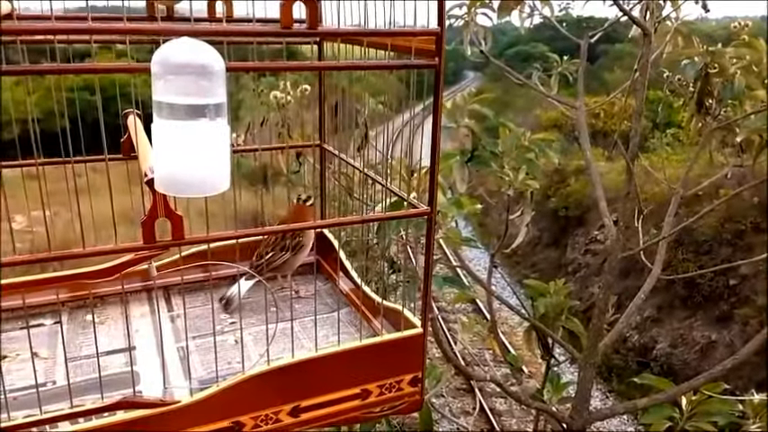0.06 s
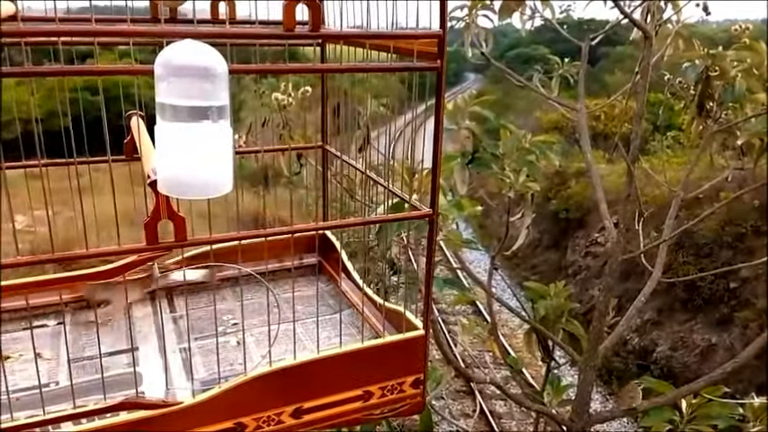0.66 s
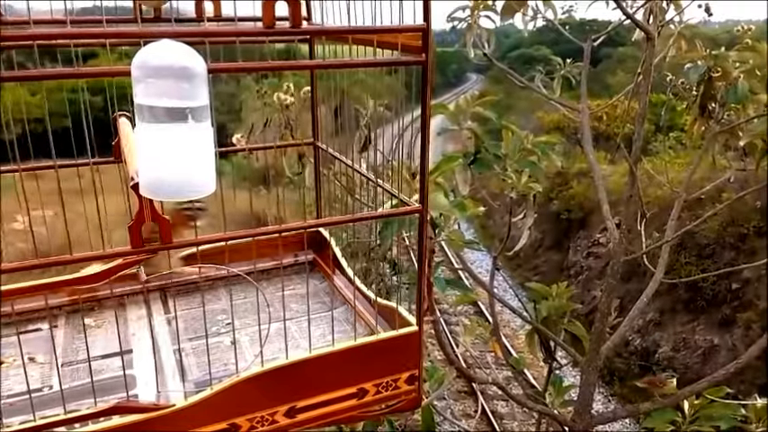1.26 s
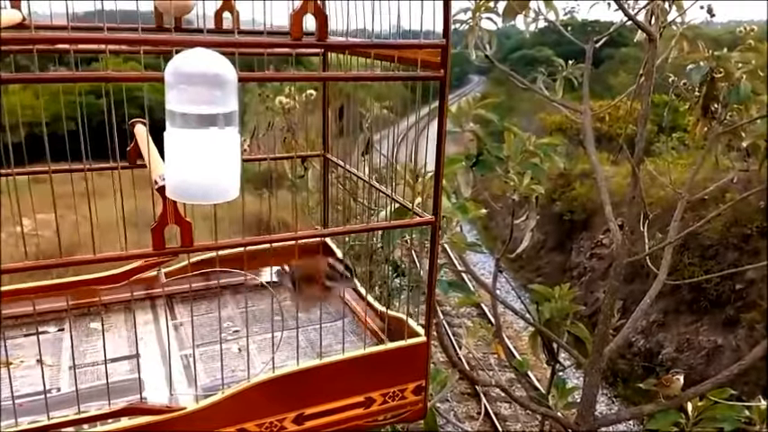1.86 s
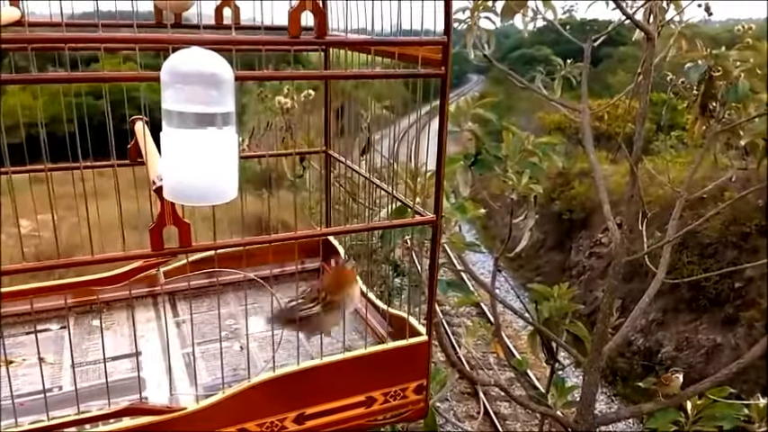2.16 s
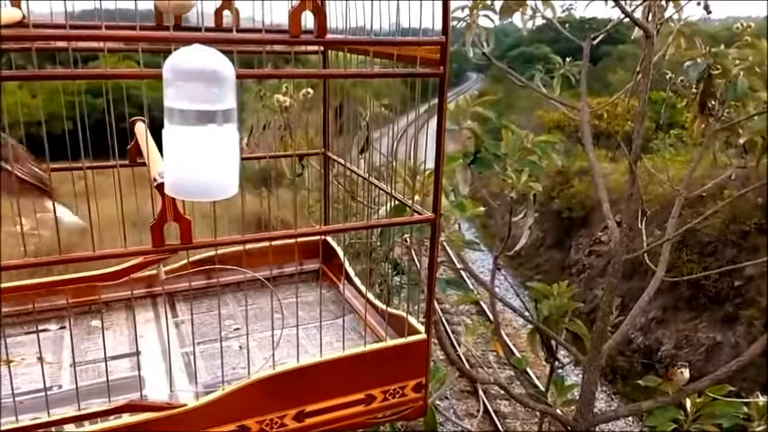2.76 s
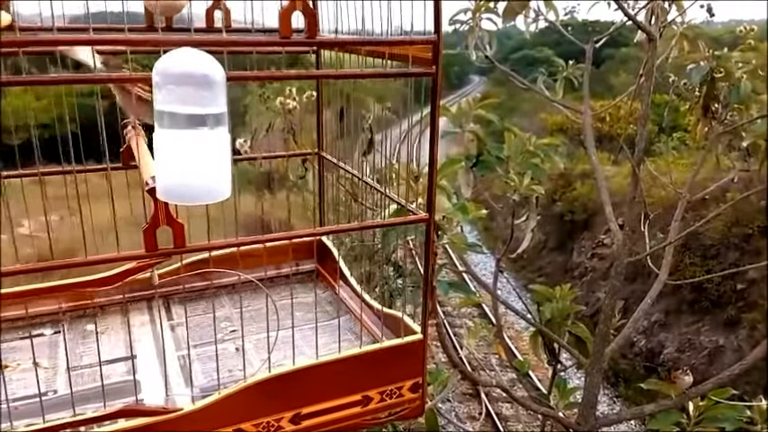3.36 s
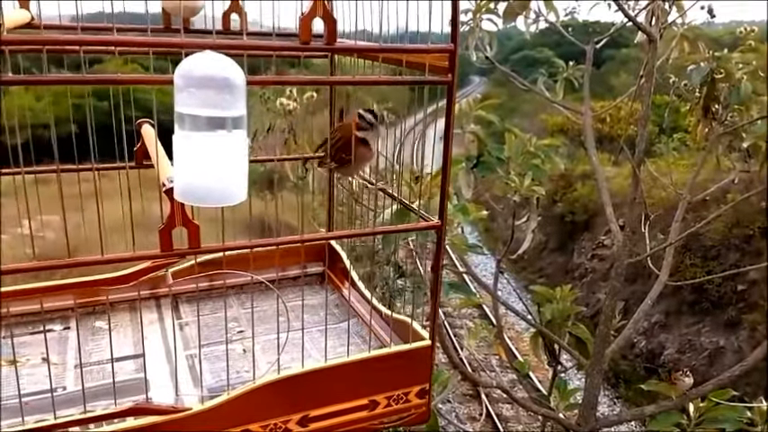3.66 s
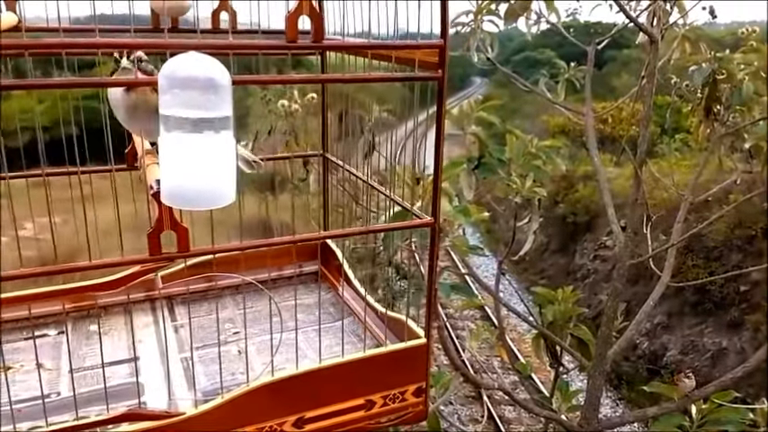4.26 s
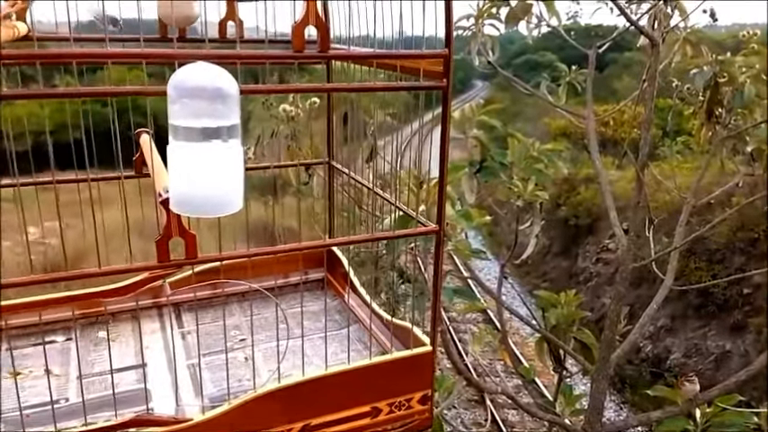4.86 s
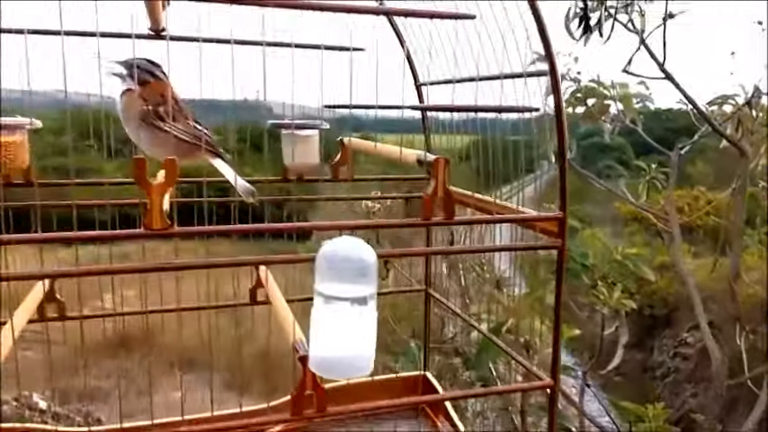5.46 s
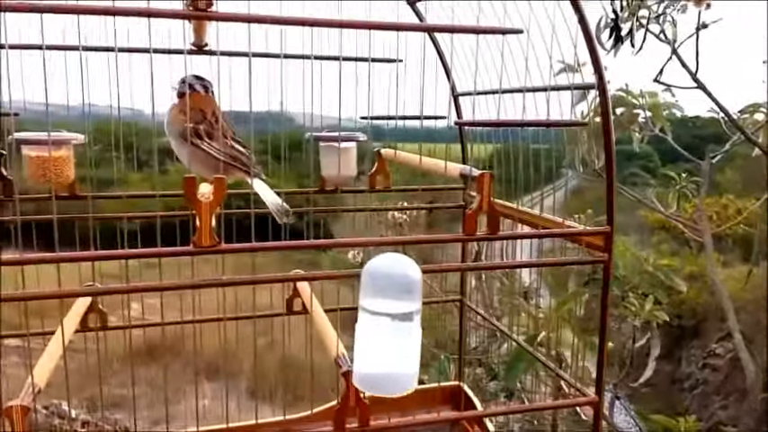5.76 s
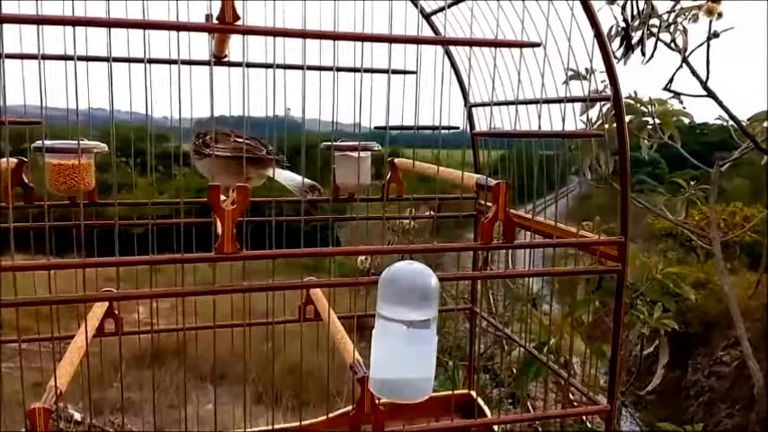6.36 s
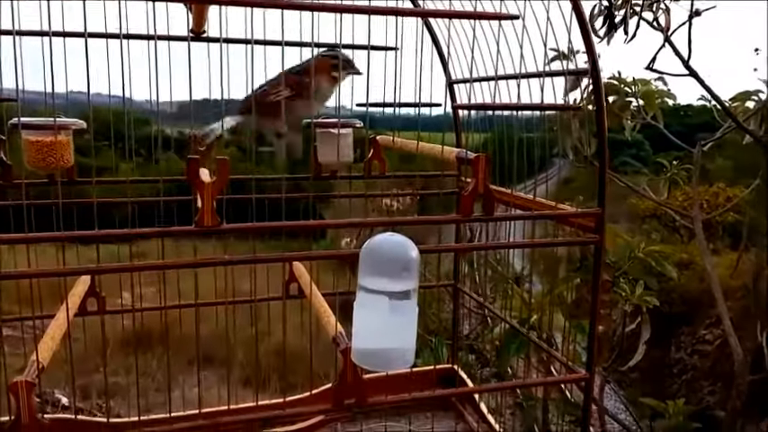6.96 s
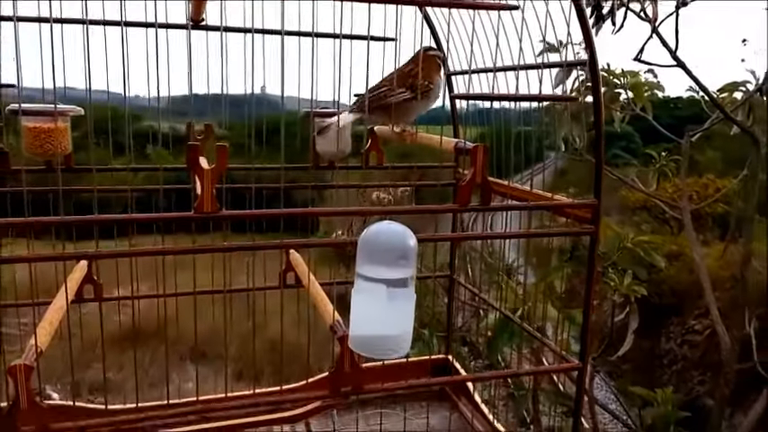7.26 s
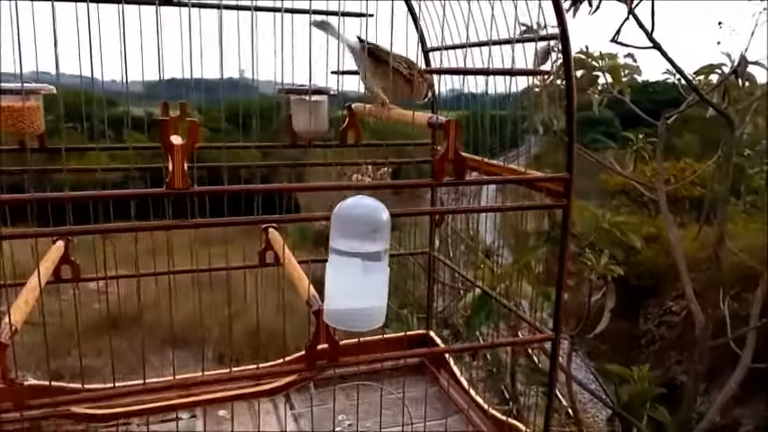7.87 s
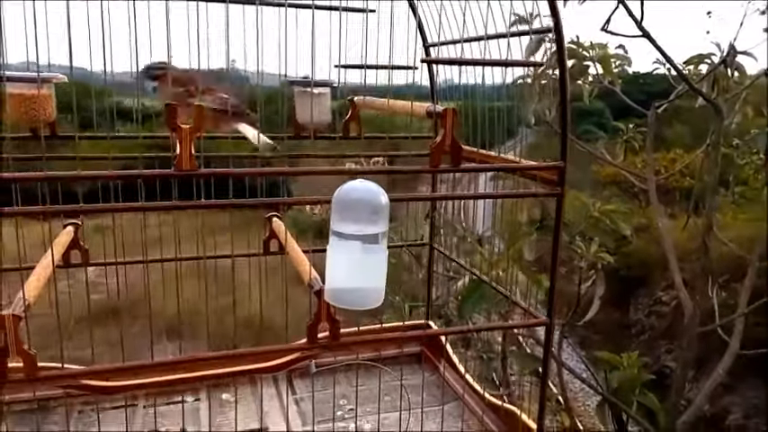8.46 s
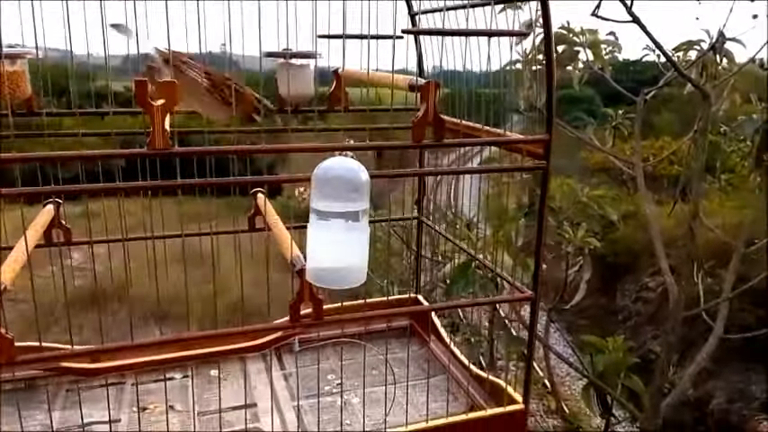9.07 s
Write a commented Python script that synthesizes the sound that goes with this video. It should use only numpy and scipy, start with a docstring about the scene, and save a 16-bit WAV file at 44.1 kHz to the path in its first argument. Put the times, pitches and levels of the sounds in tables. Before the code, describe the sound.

A small bird sings slurred whistles close by and hops about its wooden wire cage, over a steady outdoor rush.

```python
"""A steady outdoor rush, one faint chirp, then a sparrow hopping about its cage close to a phone.
Its feet and wings knock the wooden tray and rattle the wires, while other birds whistle far off.
It sings three phrases of slurred whistles, the second from a higher perch; the cage colours each
note on its way to the two microphones. The phone's gain control ducks on the loudest notes and
lets the rush swell back slowly."""
import sys
import numpy as np
from scipy import signal
from scipy.fft import rfft, irfft, next_fast_len
from scipy.io import wavfile
from scipy.ndimage import uniform_filter1d, minimum_filter1d, map_coordinates

SR = 44100
rng = np.random.default_rng(int(sys.argv[2]) if len(sys.argv) > 2 else 0)


def persist_wave(psi):
    """Save psi, clipped to +-1, as 16-bit WAV."""
    counts = np.round(np.clip(psi, -1, 1) * 32767).astype(np.int16)
    wavfile.write(sys.argv[1], SR, np.atleast_2d(counts).T)


N = 407043


def amp(db):
    """Decibels to gain."""
    return 10 ** (np.asarray(db) / 20)


def along(points, hz):
    """Read (Hz, value) points on a log frequency axis."""
    point_hz, values = np.transpose(points)
    return np.interp(np.log(hz + 1), np.log(point_hz), values)


def unit(x):
    """Scale to rms 1."""
    return x / np.sqrt(np.mean(x ** 2) + 1e-20)


def filtered(x, response):
    """Filter x by a gain given as a function of Hz."""
    n = x.shape[-1]
    size = next_fast_len(n + 8192)
    return irfft(rfft(x, size) * response(np.fft.rfftfreq(size, 1 / SR)), size)[..., :n]


def wobble(n, rate):
    """A smooth random curve of n samples, rate knots a second."""
    return map_coordinates(rng.standard_normal(int(n * rate / SR) + 4), [np.arange(n) * rate / SR])


def sides(pan_db):
    """Left and right gains of constant power; positive is to the left."""
    gains = np.array([amp(pan_db / 2), amp(-pan_db / 2)])
    return gains / np.sqrt(np.mean(gains ** 2, axis=0))


def add(track, start, sound):
    """Mix a sound into the track from start seconds on."""
    part = track[..., max(0, round(start * SR)):][..., :sound.shape[-1]]
    part += sound[..., :part.shape[-1]]


def rush(spectrum, patchy_db):
    """Wide, faintly patchy noise, leaning to the right microphone."""
    # Each row: frequency in Hz, left over right in dB.
    balance = [(110, -10.5), (380, -5), (1290, -3), (8120, -0.5), (15000, -12)]
    # Each row: frequency in Hz, correlation between the microphones.
    likeness = [(60, 0.13), (130, 0.63), (640, 0.66), (1410, 0.56), (3100, -0.45), (6800, 0.12)]
    spectra = signal.stft(rng.standard_normal((2, N)), nperseg=512)[2]
    patches = uniform_filter1d(rng.standard_normal(spectra.shape[1:]), size=6, axis=0)
    patches = unit(uniform_filter1d(patches, size=14, axis=1))
    noise = signal.istft(spectra * amp(patchy_db * patches), nperseg=512)[1][:, :N]
    angle = lambda hz: np.arccos(np.clip(along(likeness, hz), -1, 1)) / 2
    mid_side = lambda hz: amp(along(spectrum, hz)) * [np.cos(angle(hz)), np.sin(angle(hz))]
    mid, side = filtered(noise, mid_side)
    return unit(filtered(np.array([mid + side, mid - side]), lambda hz: sides(along(balance, hz))))


def background():
    """The bed of the place: a low rush and the hiss above it, both nearly steady."""
    # Each row of both: frequency in Hz, relative noise density in dB.
    body_spectrum = [(20, -27), (55, -16), (116, -0.5), (182, 1), (294, -3), (444, -16), (639, -16.5),
                     (800, -11.5), (960, -7.5), (1220, -15), (1500, -24), (2500, -65)]
    hiss_spectrum = [(900, -36.5), (1250, -17.5), (1550, -0.5), (2150, -5), (2550, -11), (3100, -7),
                     (4240, -8.5), (5200, -15.5), (5900, -12.5), (6600, -1.5), (7200, -4.5), (7900, -18.5),
                     (10500, -24.5), (14300, -24), (15800, -36.5)]
    body = amp(-48 + 0.5 * wobble(N, 3)) * rush(body_spectrum, patchy_db=1)
    hiss = amp(-49 + 0.26 * wobble(N, 6.2)) * rush(hiss_spectrum, patchy_db=1.4)
    return body + hiss


def yard(x):
    """A thin, short tail from the ground and bushes."""
    # Each row: frequency in Hz, seconds to fall 60 dB.
    decay = [(500, .22), (8000, .17)]
    hz, t, spectra = signal.stft(rng.standard_normal((2, SR // 2)), SR, nperseg=256)
    spectra *= amp(-60 * t / along(decay, hz)[:, None])
    tail = signal.istft(spectra, SR, nperseg=256)[1][:, :SR // 2]
    return signal.fftconvolve(x, tail / np.linalg.norm(tail[0]), axes=1)[:, :N]


def twitter(start=6.21, end=6.62, first_hz=3540, last_hz=3420, arch_hz=60, length=0.052, db=-55):
    """Four faint, arched pips from a small distant bird, sinking a little, as rows for far_birds."""
    pips = zip(np.linspace(start, end, 4), np.linspace(first_hz, last_hz, 4))
    return [(at, length, hz - arch_hz, hz, hz - arch_hz, db) for at, hz in pips]


def far_birds():
    """Soft curved whistles in the centre, made uneven by distance."""
    # Each row: start and length in seconds, first, middle and last pitch in Hz, level in dB.
    calls = [(0.422, 0.29, 1913, 2000, 2070, -53.5), (1.04, 0.049, 3080, 4040, 5800, -55),
             (1.19, 0.097, 2350, 2300, 2350, -53), (1.52, 0.31, 2360, 1930, 2296, -51.5),
             (2.018, .08, 3020, 3000, 3120, -51.5), (2.252, 0.15, 2150, 2100, 2300, -49),
             (6.42, 0.082, 2704, 2476, 2470, -58.5), (6.847, 0.32, 2270, 2020, 2350, -56),
             (6.909, 0.048, 3040, 3100, 2980, -56), (7.299, 0.073, 2940, 2970, 3190, -52),
             (7.52, 0.19, 2248, 2125, 2290, -53.5), (8.26, 0.12, 2650, 2650, 2910, -52.5),
             (8.87, 0.098, 2970, 2744, 2700, -48.5)]
    track = np.zeros(N)
    for start, length, first, middle, last, db in list(calls) + twitter():
        progress = np.linspace(0, 1, int(length * SR))
        arch = np.polyfit([0, 0.5, 1], [first, middle, last], 2)
        hz = np.polyval(arch, progress) * (1 + 0.016 * wobble(len(progress), 150))
        swell = np.sqrt(np.abs(np.sin(np.pi * progress))) * amp(db + 3.4 * wobble(len(progress), 60))
        add(track, start, swell * np.sin(2 * np.pi * np.cumsum(hz) / SR))
    return np.array([track, track])


def hops(scuff_t60=0.077, tick_t60=0.15, click_t60=0.0049, click_db=-1, knock_db=-5, scuff_db=-3):
    """Close by, right of centre: feet and wings knock the tray, scuff it and rattle the wires."""
    # Each row: start in seconds, wood level in dB, wire level in dB.
    landings = [(0.68, -38, -46.5), (.79, -34.5, -55), (.811, -43, -48), (0.952, -39, -42),
                (.981, -38, -47), (1.062, -39, -44), (1.215, -45, -44.5), (1.245, -42, -48),
                (1.317, -59.5, -49.5), (1.388, -37.5, -43.5), (1.437, -44, -51), (1.975, -43.5, -55),
                (2.365, -41.5, -54.5), (2.718, -41, -51), (3.549, -41, -43), (3.914, -61, -45.5)]
    # The wooden cage and tray ring. Each row: frequency in Hz, relative dB, seconds to fall 60 dB.
    wood_modes = [(390, -15.5, 0.097), (508, -8.5, 0.23), (720, -16, 0.0304), (1345, 2.5, 0.036),
                  (1650, -6.5, 0.041), (2650, -8, .03), (3474, -0.5, 0.029)]
    # The bars rattle. Each row: frequency in Hz, relative noise density in dB.
    wire_spectrum = [(300, -29.5), (1200, 1.5), (3500, 6.5), (6500, 4), (9000, 0.5), (15000, -13.5)]
    scuff_gains = [(150, 0.17), (400, 0.97), (1400, 0.35), (4000, 0)]  # Each row: Hz, gain.
    track, t = np.zeros((2, N)), np.arange(SR // 4) / SR
    for start, wood_db, wire_db in landings:
        knock = np.zeros(len(t))
        for hz, db, t60 in wood_modes:
            ring = amp(db + rng.normal(0, 2.8) - 60 * t / t60)
            knock += ring * np.sin(2 * np.pi * hz * (1 + rng.normal(0, 0.07)) * t)
        scuff = unit(filtered(rng.standard_normal(len(t)), lambda hz: along(scuff_gains, hz)))
        wood = amp(knock_db) * knock + amp(scuff_db - 60 * t / scuff_t60) * scuff
        noise = rng.standard_normal((2, len(t)))
        wires = unit(filtered(noise, lambda hz: amp(along(wire_spectrum, hz))))
        wires *= amp(-60 * t / tick_t60) + amp(click_db - 60 * t / click_t60)
        add(track, start, amp(wood_db) * wood + amp(wire_db) * wires)
    return track * sides(pan_db=-4.5)[:, None]


def wire_ping(start=0.953, hz=6270, level_db=-39, t60=0.05):
    """One landing plucks a single bar, which pings."""
    track, t = np.zeros(N), np.arange(SR // 4) / SR
    add(track, start, amp(level_db - 60 * t / t60) * np.sin(2 * np.pi * hz * t))
    return track


def cage_echoes(x, tray_db=-14, far_s=0.055, far_db=-33, scatter_db=-19, scatter_t60=0.13):
    """Tray reflections beat against each glide, the bars smear it, and a weak far echo follows."""
    tray_s = np.array([[0.0027], [0.0024]])  # left, right
    echo = lambda hz, delay_s, db: amp(db) * np.exp(-2j * np.pi * hz * delay_s)
    echoed = filtered(x, lambda hz: 1 + echo(hz, tray_s, tray_db) + echo(hz, far_s, far_db))
    t = np.arange(SR // 10) / SR
    bars = rng.standard_normal((2, len(t))) * amp(-60 * t / scatter_t60)
    bars /= np.linalg.norm(bars, axis=1, keepdims=True)
    return echoed + amp(scatter_db) * signal.fftconvolve(x, bars, axes=1)[:, :N]


def perch(start, hz, high_from_s=4, high_until_s=6.5):
    """Gain, balance and phase lead along a glide, on the path from the bird's perch to the phone."""
    # The cage's colouring. Each row: frequency in Hz, gain in dB, left over right in dB.
    low_colour = [(2960, -2.5, 8), (3410, -4.5, 7.2), (3520, -11, 6.5), (3940, -5.5, -1), (4274, 2, 4.5),
                  (4390, 1, -10), (4780, 2, -8.5), (5087, 8, 1), (5450, 0.5, -0.8), (6130, 6, -2),
                  (6700, 2.5, 2)]
    high_colour = [(3000, 0, 5.5), (3460, -2.5, -1), (3800, -5, 2), (4015, -3.5, 6.5), (4250, 2, -8),
                   (4420, 2, -8), (4590, 0.5, 0.5), (5005, .5, -3.5), (5350, 5.5, -6.5), (6380, 0.5, -11),
                   (7040, -2, -6), (7600, -13.5, -1)]
    # The microphones hear a note out of step. Each row: frequency in Hz, left's lead in radians.
    low_lead = [(3200, .3), (3450, .2), (3700, -1.2), (4000, -.5), (4250, -1.2), (4500, 1.2), (4700, 2.4),
                (5100, 2.5), (5700, 3.1), (6300, 5.5)]
    high_lead = [(3300, 1.83), (3900, 0.5), (4200, 3.5), (4400, 3.5), (5250, 3), (5600, 4), (6600, 8),
                 (6950, 1)]
    on_high = high_from_s < start < high_until_s
    colour, lead = (high_colour, high_lead) if on_high else (low_colour, low_lead)
    colour = np.array(sorted(colour))
    gain, balance = colour[:, [0, 1]], colour[:, [0, 2]]
    return [uniform_filter1d(along(curve, hz), size=220) for curve in (gain, balance, lead)]


def glide(t, length, from_hz, to_hz, half_s, steepness, flick_hz):
    """Pitch of a slur: a quick flick, an S-shaped slide, a steady sag if it falls, a closing drop."""
    flick_s, drop_hz, drop_s = 0.021, 100, 0.0064
    sag_hz_per_s = 2110 if to_hz < from_hz else 0
    travel = lambda s: 1 - 1 / (1 + (s / half_s) ** steepness)
    slide = (to_hz - from_hz + sag_hz_per_s * length) * travel(t) / travel(length) - sag_hz_per_s * t
    flick = flick_hz * np.exp(-t / flick_s)
    drop = drop_hz * np.exp((t - length) / drop_s)
    return from_hz + slide + flick - drop


def whistle(note, easy_db=-11, easy_hz=4900, waver=0.0027, flutter_db=0.87, release_s=0.021):
    """One unsteady, nearly pure slur; its faint overtones grow with level and on the highest pitches."""
    # Base levels of harmonics two, three and four, in dB against the fundamental.
    overtones = [-43, -37.5, -47]
    # How well an overtone carries to the microphones. Each row: frequency in Hz, gain in dB.
    carry = [(6000, 7.5), (7200, 5.5), (8500, 5), (10000, -9.5), (11600, 0.5), (13200, -5), (14300, 4.5),
             (15200, 7), (16300, -9), (20000, -62)]
    # Brief kinks in the pitch heard. Each row: time in seconds, pitch jump in Hz, width in seconds.
    pitch_kinks = [(1.944, -380, 0.0062), (4.71, 234, .01)]
    start, length, *slur, first_db, last_db, attack_s = note
    n = int(length * SR)
    t = np.arange(n) / SR
    hz = glide(t, length, *slur)
    hz += sum(jump * np.exp(-((start + t - at) / width) ** 2) for at, jump, width in pitch_kinks)
    colour_db, pan_db, lead = perch(start, hz)
    db = first_db + (last_db - first_db) * t / length + colour_db
    phase = 2 * np.pi * np.cumsum(hz * (1 + waver * (wobble(n, 250) + wobble(n, 60)))) / SR
    tone = sides(pan_db) * np.sin(phase + np.array([lead, -lead]) / 2)
    strain_db = 0.31 * (db - easy_db) + 16 * np.maximum(0, np.log2(hz / easy_hz))
    for order, base_db in enumerate(overtones, 2):
        gain = amp(base_db + along(carry, order * hz) + strain_db + 2 * wobble(n, 150))
        rasp = 0.2 * wobble(n, 700)
        tone += sides(pan_db=-11)[:, None] * gain * np.sin(order * (phase + rasp))
    swell = np.sin(np.pi / 2 * np.clip(t / attack_s, 0, 1)) ** 2
    release = np.clip((length - t) / release_s, 0, 1)
    level = amp(db + flutter_db * (wobble(n, 160) + wobble(n, 61.6)))
    return start, np.sqrt(2) * swell * release * level * tone


def sparrow():
    """One faint chirp, then three phrases of slurred whistles, close to the microphones."""
    # Each row: start and length in seconds, from and to pitch in Hz, the slide's half-way time in
    # seconds, its steepness, opening flick in Hz, first and last level in dB, attack in seconds.
    notes = [(0, 0.072, 2953, 2860, 0.054, 2.3, 0, -35.5, -39.5, 0.0016),
             (1.46, .305, 4960, 3733, 0.25, 3.02, -79, -30.5, -20, 0.088),
             (1.874, .212, 4117, 5167, 0.093, 3.14, -1150, -17, -19.5, 0.019),
             (2.183, 0.34, 5058, 3055, .11, 2.59, -100, -12.5, -12, 0.065),
             (2.66, 0.3324, 7640, 3113, 0.062, 1.52, -750, -11, -18, 0.081),
             (3.097, 0.23, 7240, 3172, 0.047, 1.37, -650, -7, -20, 0.072),
             (4.513, 0.21, 3945, 3264, 0.097, 5, 0, -24, -31.5, 0.048),
             (4.855, .243, 3275, 4398, 0.091, 6, -450, -21, -16.5, 0.058),
             (5.214, 0.2502, 5200, 3378, .16, 6.1, 649.5, -8.5, -14, 0.086),
             (5.576, .308, 7790, 2935, 0.062, 2.19, -130, 5.5, -27.5, .13),
             (8.115, 0.279, 4944, 3757, 0.24, 2.8, -58, -35.5, -15, 0.055),
             (8.504, 0.21, 4160, 5080, 0.082, 4.9, -1000, -3, -29.5, 0.054),
             (8.803, 0.3457, 5232, 3000, .1, 2.14, -400, -10, -22.5, 0.097)]
    song = np.zeros((2, N))
    for note in notes:
        add(song, *whistle(note))
    return song


def scene():
    """The cage close by, birds far off and the rush all around."""
    near = cage_echoes(sparrow()) + hops() + wire_ping()
    far = far_birds()
    tail = amp(-24) * yard(near) + amp(-8) * yard(far)
    return near + far + tail + background()


def gain_control(x, limit_db=-16, hold_s=0.18, recovery_db_per_s=9.5, start_db=-11):
    """A loud note pulls the phone's gain down fast; it holds, then climbs back slowly."""
    power = uniform_filter1d(np.mean(x ** 2, axis=0), size=256)
    level_db = 10 * np.log10(np.abs(power) + 1e-12)
    needed_db = np.minimum(0, limit_db - level_db)
    half_hold = int(hold_s * SR / 2)
    held_db = minimum_filter1d(needed_db, 2 * half_hold + 1, origin=half_hold)
    held_db[0] = start_db  # the gain starts turned down
    climb_db = recovery_db_per_s * np.arange(N) / SR
    gain_db = np.minimum.accumulate(held_db - climb_db) + climb_db
    return x * amp(uniform_filter1d(gain_db, size=513, origin=256))  # 12 ms attack


def record(dry, top_hz=15750):
    """The phone's gain control and band limit."""
    return filtered(gain_control(dry), lambda hz: hz < top_hz)


dry = scene()
out = record(dry)
persist_wave(out)
```